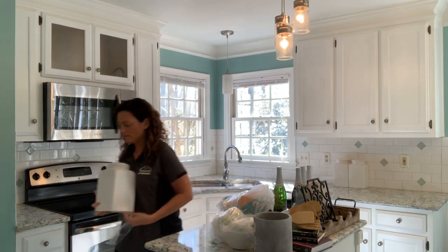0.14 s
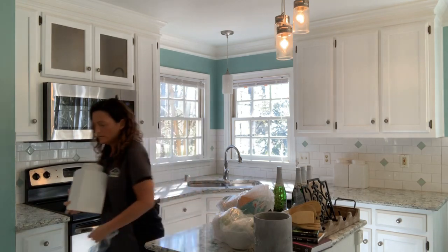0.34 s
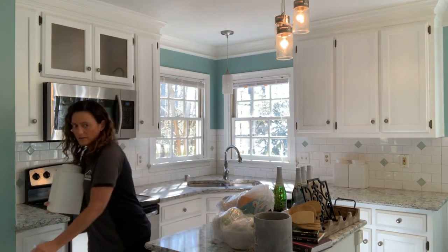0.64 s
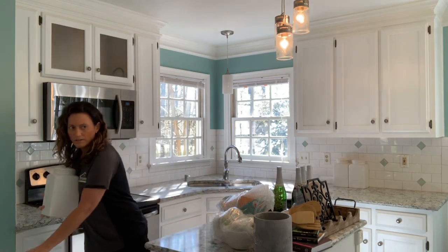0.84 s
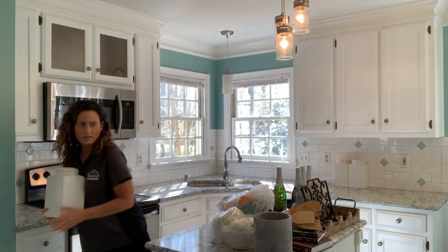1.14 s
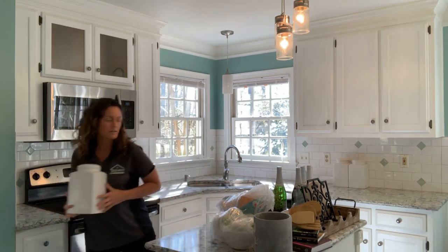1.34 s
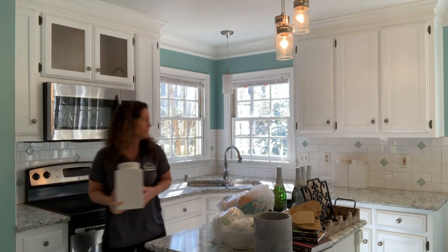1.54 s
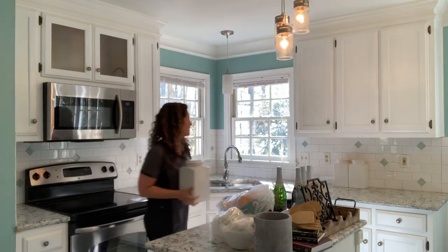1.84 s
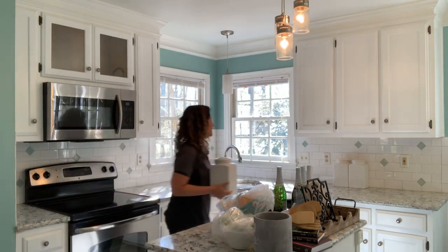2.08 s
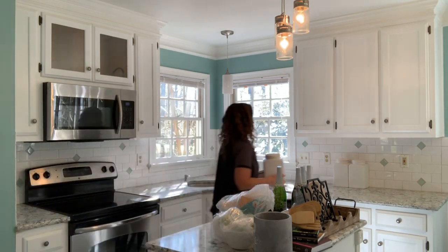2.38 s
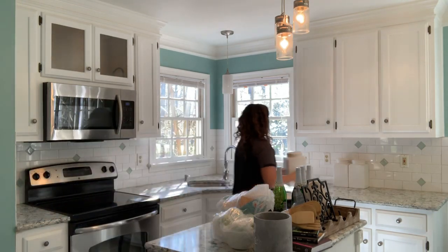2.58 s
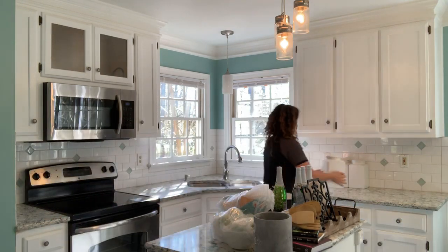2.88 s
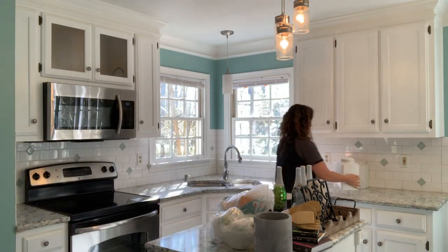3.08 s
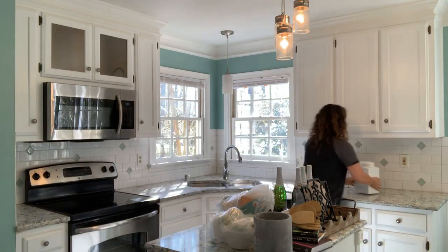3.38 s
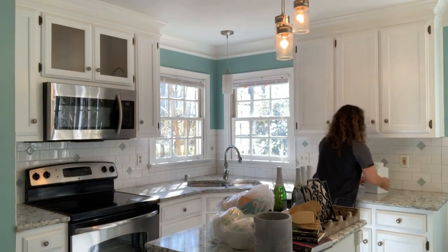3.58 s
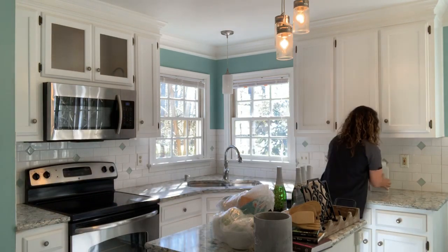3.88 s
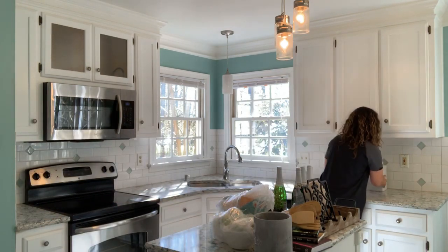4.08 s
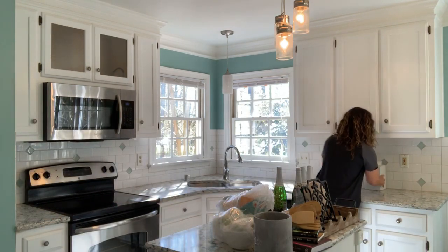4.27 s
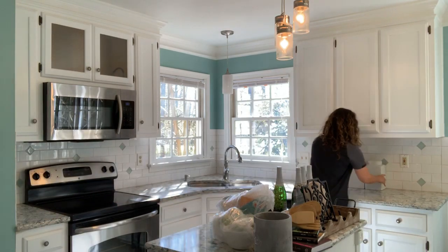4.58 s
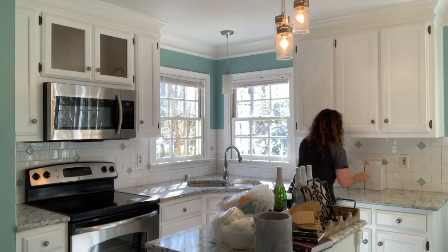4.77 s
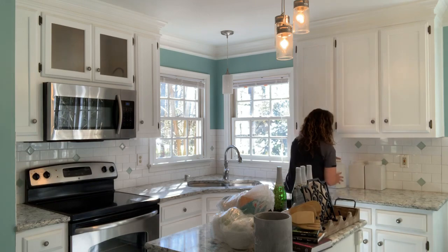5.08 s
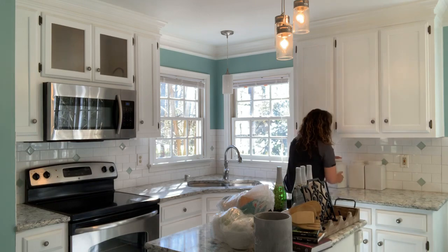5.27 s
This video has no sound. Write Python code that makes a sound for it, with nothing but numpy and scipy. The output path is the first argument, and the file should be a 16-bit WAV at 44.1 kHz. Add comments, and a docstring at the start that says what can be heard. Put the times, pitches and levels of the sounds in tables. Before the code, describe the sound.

Footsteps and cloth rustle, a wooden door bangs with quick rebounds, then a ceramic canister knocks and rocks onto a counter and scrapes along it.

```python
"""Lidded canister set down in a kitchen

A woman walks with a ceramic canister, clothes rustling; a wooden door bangs. She sets it on the counter in
two rocking blows with a chattering lid, knocks it against a neighbour and slides it: damped modes, noise bursts, grains.
The microphone stands across the hard-walled room, so most of every knock is reverberation.
Air noise and a refrigerator hum lie underneath.
"""
import sys
import numpy as np
from scipy import signal
from scipy.fft import rfft, irfft, next_fast_len
from scipy.io import wavfile
from scipy.ndimage import map_coordinates

SR = 44100
rng = np.random.default_rng(int(sys.argv[2]) if len(sys.argv) > 2 else 0)


def master(y):
    """Save y as 16-bit WAV."""
    cut = np.clip(np.atleast_2d(y).T, -1, 1)
    pcm = np.round(cut * 32767)  # scale
    wavfile.write(sys.argv[1], SR, pcm.astype(np.int16))


N = 239145
TIME = np.arange(N) / SR
AGE = np.arange(SR // 2) / SR  # s since a blow

# Levels in mode and spectrum tables are relative; mode t60 is multiplied by ring()'s hold.

# canister wall and lid modes: f/Hz, level/dB, t60/s before hold
CANISTER_MODES = [(1790, -10, .15), (1885, -11, .3), (2039, -12, .45), (2189, -6, .5), (2299, -11, .2),
                  (2895, -8, .35), (3080, -12, .15), (3250, -5, .25), (3540, -7, .2), (4220, 0, .33),
                  (4347, -2, .28), (4728, -11, .3), (5035, -10, .2), (5240, -7, .15), (5385, -11, .22),
                  (6320, -17, .18), (6553, -20, .2), (6860, -16, .25), (7064, -17, .2), (7204, -14, .22),
                  (7385, -18, .2), (7563, -16, .25), (7720, -13, .25), (8729, -25, .25), (9116, -21, .28),
                  (9850, -26, .25), (10492, -32, .3), (11015, -28, .22), (12642, -30, .22),
                  (13983, -30, .2)]
# neighbouring canister modes: f/Hz, level/dB, t60/s before hold
NEIGHBOUR_MODES = [(1201, 0, .35), (1325, -4, .4), (1560, -3, .2), (1712, -4, .35), (1890, -7, .9),
                   (2121, -6, .5), (2480, -6, .15), (2890, -8, .3), (3149, -6, .25), (3505, -8, .35),
                   (3840, -11, .35), (4550, -12, .3), (4748, -12, .35), (5405, -14, .3), (5640, -12, .3),
                   (6830, -18, .3), (7530, -19, .4), (7644, -18, .4), (8436, -23, .4), (10546, -27, .4),
                   (11300, -27, .4)]
# counter and cabinet modes: f/Hz, level/dB, t60/s before hold
COUNTER_MODES = [(116, -25, 0.12), (207, -11, 0.11), (269.4, -2.5, 0.13), (314, -2, 0.061),
                 (369, -0.5, 0.08), (404.8, -1.5, 0.15), (484.5, 1.5, 0.083), (557, -12.5, 0.049),
                 (598.4, -4, 0.052), (703, 1, 0.099)]
# hollow body spectrum: f/clack pitch [ratio], level/dB
CLACK_SPECTRUM = [(.22, -15.5), (.6, -3), (.85, -2), (1, 3.5), (1.15, -10), (1.35, -4), (1.6, -9),
                  (1.9, -16), (2.6, -23), (4.4, -45), (13, -61)]
# glaze spectrum: f/Hz, level/dB
GLAZE_SPECTRUM = [(600, -10), (1700, 17), (2400, 13.5), (3400, 13), (5300, 4), (6100, 0.5), (7600, -2),
                  (9000, -9), (12000, -20), (16000, -28)]


def canister(chatter_s=.004, bounces=3):
    """Each contact thuds the counter, clacks the hollow body and rings the ceramic, whose loose lid chatters."""
    out = np.zeros(N)
    neighbour = ring(NEIGHBOUR_MODES, attack_s=0.00026, hold=0.69)
    upper = ring(glaze(t60_s=0.11), attack_s=0.00037)
    for t, thud_db, clack_db, clack_hz, click_db, own_db, neighbour_db in contacts():
        thud = amp(thud_db) * ring(COUNTER_MODES, attack_s=0.0012, hold=0.84, detune=0.012)
        clack_spectrum = [(ratio * clack_hz, db) for ratio, db in CLACK_SPECTRUM]
        clack = amp(clack_db) * burst(clack_spectrum, t60_s=0.037, attack_s=0.00088)
        snap = burst(GLAZE_SPECTRUM, t60_s=0.035, attack_s=0.00075)
        click = amp(click_db) * (amp(-4.0) * snap + amp(-15.5) * upper)
        add(out, t, kitchen(thud + clack + click, direct_db=-4.0))

        own = ring(CANISTER_MODES, attack_s=0.00056, hold=0.32, detune=0.0027)
        chime = (amp(own_db) * own + amp(neighbour_db) * neighbour) / np.sqrt(bounces)
        for bounce in range(bounces):
            delay_s = bounce * chatter_s * rng.uniform(.7, 1.2)
            add(out, t + delay_s, kitchen(chime, direct_db=-6.5))
    return out


# canister lands and rocks on its base: t/s, force level/dB, first rock/s, rocks [count],
# loss at first rock/dB, clack pitch f/Hz, then levels relative to force:
# thud/dB, clack/dB, glaze click/dB, own ring/dB, neighbour's ring/dB
LANDING_BLOWS = [(3.451, -21, 0.066, 1, 3.5, 920, -3.5, 3.5, -0.5, 0, -10.5),
                 (3.674, -22, 0.051, 4, 2.05, 876, 0.5, -2, -1, 1, -4.5),
                 (4.465, -20, .030, 1, 5, 1200, 1, 0, -1.5, -19.5, -9)]
FAR_EDGE_S, FAR_EDGE_DB = .008, -3  # far edge of the base follows the near one
ROCK_SHRINK, ROCK_LOSS_POWER = 0.94, 1.3  # interval ratio per rock; loss grows as rock number ** power
# light taps of lid and base: t/s, clack level/dB, clack pitch f/Hz, glaze click rel. clack/dB
LIGHT_TAPS = [(1.363, -67, 1500, 2), (2.059, -54, 1230, 3.5), (3.055, -71, 1210, 12),
              (3.441, -41, 960, -25), (4.402, -41, 1220, -1.5), (4.433, -36, 925, -8),
              (4.611, -24, 920, -6.5), (4.687, -26.5, 1385, -7), (4.896, -37, 745, -21)]
TAP_THUD_DB, TAP_RING_DB = -21.5, -16.5  # thud rel. clack, ring rel. click


def contacts():
    """Touches: t/s, thud/dB, clack/dB, clack f/Hz, click/dB, own ring/dB, neighbour's ring/dB; rocks lose force."""
    for (t, force_db, rock_s, rocks, loss_db, clack_hz,
         thud_db, clack_db, click_db, own_db, neighbour_db) in LANDING_BLOWS:
        blows = [(t, force_db), (t + FAR_EDGE_S, force_db + FAR_EDGE_DB)]
        for k in range(round(rocks)):
            t += rock_s * ROCK_SHRINK ** k
            blows.append((t, force_db - loss_db * (k + 1) ** ROCK_LOSS_POWER))
        for at, db in blows:
            yield at, db + thud_db, db + clack_db, clack_hz, db + click_db, db + own_db, db + neighbour_db
    for t, db, clack_hz, click_db in LIGHT_TAPS:
        ring_db = db + click_db + TAP_RING_DB
        yield t, db + TAP_THUD_DB, db, clack_hz, db + click_db, ring_db, ring_db


def glaze(t60_s, count=90):
    """Crowd of weak upper modes of fired clay: rows of f/Hz, level/dB, t60/s."""
    hz = np.linspace(1500, 15500, count) + rng.uniform(-70, 70, count)
    db = along(GLAZE_SPECTRUM, hz) + 3 * rng.standard_normal(count)
    return np.transpose([hz, db, np.full(count, t60_s)])


# pushes sliding the base over stone: start t/s, length/s, judder level/dB, grit rel. judder/dB
SLIDE_PUSHES = [(4.007, .24, -40, -8), (4.329, 0.12, -44, -17), (4.649, 0.095, -33, 3),
                (4.782, 0.23, -38, -7.5), (5.235, .17, -44.5, -13.5)]
# stick-slip spectrum: f/Hz, level/dB
JUDDER_SPECTRUM = [(100, -24), (200, -5.5), (280, -1.5), (450, 2.5), (700, -0.5), (950, -7), (1300, -44),
                   (2000, -20), (3500, -50), (9000, -50)]
# grit grain spectrum: f/Hz, level/dB
GRIT_SPECTRUM = [(400, -7), (780, 6), (940, 13.5), (1150, 7), (1350, 8), (1600, 4), (1950, -1.5),
                 (2600, -23), (3700, -10.5), (5650, -7), (9000, -17.5), (15000, -33)]


def slide():
    """The base sticks and slips at an uneven rate; grains of grit catch and make the ceramic sing."""
    judder, grit = np.zeros((2, N))
    for t, length_s, db, grit_db in SLIDE_PUSHES:
        push = amp(db) * stroke(t, length_s, rise=0.28, release_db_per_s=263)
        judder += push
        grit += amp(grit_db) * push

    slip_hz = 130 * np.exp(.45 * wobble(25))
    slip_clicks = np.diff(np.floor(np.cumsum(slip_hz) / SR), prepend=0)
    slips = slip_clicks * amp(2.8 * rng.standard_normal(N))
    catches = rng.random(N) < 500 / SR  # 500 a second on average
    grains = catches * rng.standard_normal(N) * amp(4 * wobble(45))

    upper = ring(glaze(t60_s=0.13), attack_s=.0002)
    body = ring(NEIGHBOUR_MODES, attack_s=0.00047, hold=0.47) + amp(-14.5) * upper
    singing = unit(signal.fftconvolve(grains, body)[:N])
    stick_slip = judder * (coloured(slips, JUDDER_SPECTRUM) + amp(-27.5) * singing)
    gritty = grit * (coloured(grains, GRIT_SPECTRUM) + amp(-5.5) * singing)
    return kitchen(stick_slip + gritty, direct_db=-6.0)[:N]


# door panel spectrum: f/knock pitch [ratio], level/dB
PANEL_SPECTRUM = [(.2, -42), (.45, 3), (.75, -3.5), (1, 11), (1.3, -4.5), (1.7, -31), (3, -35), (8, -43),
                  (25, -78)]
# wood chattering or brushed: f/Hz, level/dB
WOOD_SPECTRUM = [(200, -20), (680, 6.5), (1000, 0.5), (1300, -0.5), (1700, -7), (2600, -6), (4200, -8.5),
                 (5500, -18), (7500, -24.5), (10000, -42), (15000, -54)]
# floor and cabinet thump spectrum: f/Hz, level/dB
FLOOR_SPECTRUM = [(25, -31), (50, -36), (75, 2.5), (100, 2.5), (135, -15.5), (185, -26), (260, -6.5),
                  (330, -22.5), (700, -22.5), (2000, -33.5), (6000, -63)]
BANG_S, SHUDDER_S = 2.253, .0228  # first blow; interval between rebounds
KNOCK_DB, KNOCK_LOSS_DB = -19.5, 2.9  # panel: first blow, loss per rebound
DOOR_RATTLE_DB, DOOR_RATTLE_LOSS_DB = -23, 1.4  # frame: first blow, loss per rebound
THUMP_DB, THUMP_LOSS_DB = -35.5, 6.5  # cabinet: midway between rebounds 2 and 3, loss per rebound
KNOCK_HZ, SETTLED_HZ, KNOCK_GLIDE = 444, 243, 0.44  # pitch sinks; share of gap left per rebound


def cupboard(blows=5):
    """A wooden door bangs and rebounds evenly, ever softer and deeper; the rebounds shake the cabinet."""
    out = np.zeros(N)
    for k in range(blows):
        knock_hz = SETTLED_HZ + (KNOCK_HZ - SETTLED_HZ) * KNOCK_GLIDE ** k
        thump_gain = (k > 0) * amp(THUMP_DB - THUMP_LOSS_DB * (k - 2.5))
        thump = thump_gain * burst(FLOOR_SPECTRUM, t60_s=0.063, attack_s=0.00076)
        panel = [(ratio * knock_hz, db) for ratio, db in PANEL_SPECTRUM]
        knock = amp(KNOCK_DB - KNOCK_LOSS_DB * k) * burst(panel, t60_s=0.052, attack_s=0.0015)
        rattle_gain = amp(DOOR_RATTLE_DB - DOOR_RATTLE_LOSS_DB * k)
        rattle = rattle_gain * burst(WOOD_SPECTRUM, t60_s=0.045, attack_s=0.0011)
        bang = kitchen(thump + knock + rattle, direct_db=-8, mode_db=-57.5)
        add(out, BANG_S + k * SHUDDER_S, bang)
    return out


# footfalls on the wooden floor: t/s, heel level/dB
FOOTFALLS = [(0.226, -42), (.886, -45.5), (0.976, -43.5), (1.363, -42.5), (1.727, -37.5), (2.72, -48),
             (4.269, -42), (5.149, -46)]
TOE_S, TOE_DB = .052, -3.5  # toe after heel, rel. heel
SCUFF_DB, SCUFF_GROWTH = -51, 1.36  # brush at the heaviest step; dB lost per dB of a lighter step
SCUFF_LEAD_S, SCUFF_S = 0.051, 0.072  # brush starts before the heel; length before release


def walker():
    """Heel, then toe, thump the floor; the heavier the step, the more the sole brushes."""
    out, brush = np.zeros((2, N))
    heaviest_db = max(db for t, db in FOOTFALLS)
    for t, db in FOOTFALLS:
        for at, level_db in [(t, db), (t + TOE_S, db + TOE_DB)]:
            thump = amp(level_db) * burst(FLOOR_SPECTRUM, t60_s=0.076, attack_s=0.0049)
            add(out, at, kitchen(thump, direct_db=-3.5, mode_db=-55))
        scuff_db = SCUFF_DB + SCUFF_GROWTH * (db - heaviest_db)
        brush += amp(scuff_db) * stroke(t - SCUFF_LEAD_S, SCUFF_S, rise=0.94, release_db_per_s=113)
    return out + brush * coloured(rng.standard_normal(N), WOOD_SPECTRUM)


# sleeve and shirt swishes, one per arm movement: start t/s, length/s, rub level/dB
ARM_SWISHES = [(-.14, 0.52, -44), (.36, 0.22, -44.5), (0.75, .19, -46.5), (1.22, 0.13, -53.5),
               (1.468, 0.22, -51.5), (2.008, 0.068, -51), (2.135, 0.079, -55.5), (2.6, 0.14, -56.5),
               (2.85, 0.036, -57), (3.05, 0.066, -74), (3.32, 0.092, -62)]
# cloth spectrum: f/Hz, level/dB
CLOTH_SPECTRUM = [(300, -16), (450, -5), (700, -7), (1250, -8), (1800, -9.5), (2800, -8), (5000, -4.5),
                  (7800, -6), (9000, -11.5), (15800, -15.5)]
# canister modes under the palm: f/Hz, level/dB, t60/s before hold
HELD_MODES = [(1800, 8, 0.38), (2260, 3, 0.7), (2900, -3, 0.56), (3700, 2, 0.58), (4700, 1, 0.83)]
PALM_DB, PALM_GROWTH = -31, 0.64  # level at rub = 1; exponent below 1: grows more slowly than cloth


def clothes():
    """Each arm movement rubs cloth in fine uneven grains, and the palm on the carried canister."""
    swishes = [amp(db) * stroke(t, length_s, rise=1.0, release_db_per_s=66)
               for t, length_s, db in ARM_SWISHES]
    rub = np.linalg.norm(swishes, axis=0) * amp(0.95 * wobble(21.84))
    fibres = coloured(rng.standard_normal(N) * amp(1.7 * wobble(250)), CLOTH_SPECTRUM)
    held = ring(HELD_MODES, attack_s=0.00083, hold=0.091)
    singing = unit(signal.fftconvolve(rng.standard_normal(N), held)[:N])
    return amp(-4.5) * rub * fibres + amp(PALM_DB) * rub ** PALM_GROWTH * singing


# moving air spectrum: f/Hz, level/dB
AIR_SPECTRUM = [(15, -64), (25, -0.5), (50, -0.5), (102, -0.5), (152, -6.5), (184, -13.5), (222, -5),
                (248, 2), (276, -10), (437, -9), (572, -14.5), (834, -15.5), (2330, -27), (4330, -30),
                (15800, -55)]
# refrigerator tones: f/Hz, peak level/dB
HUM_TONES = [(99, -54.5), (199.2, -56), (441, -64.5)]


def room_tone():
    """Moving air as coloured noise; the refrigerator's hum as sines of wandering phase."""
    air = amp(-50.5 + 0.31 * wobble(4.3)) * coloured(rng.standard_normal(N), AIR_SPECTRUM)
    hum = sum(amp(db) * np.sin(2 * np.pi * hz * TIME + 0.62 * wobble(4.23)) for hz, db in HUM_TONES)
    return air + hum


# diffuse reverberation: f/Hz, t60/s
KITCHEN_T60 = [(70, 0.19), (250, 0.71), (600, 0.72), (1500, 0.69), (4000, 0.54), (8000, 0.41),
               (15000, 0.72)]
STANDING_HZ = 74.5  # strongest standing wave


def kitchen(x, direct_db, walls_db=-6, build_s=0.0012, mode_db=-55, mode_t60_s=0.57, count=8):
    """Direct sound, a few reflections, a diffuse tail and one low standing wave; levels rel. diffuse tail."""
    hz, t, z = signal.stft(rng.standard_normal(SR), SR, nperseg=256)
    decay = amp(-60 * t / along(KITCHEN_T60, hz)[:, None])
    response = signal.istft(z * decay, SR, nperseg=256)[1]
    age = np.arange(len(response)) / SR
    response *= 1 - np.exp(-age / build_s)
    response /= np.linalg.norm(response)
    response += amp(mode_db - 60 * age / mode_t60_s) * np.sin(2 * np.pi * STANDING_HZ * age)
    delay_s, size = rng.uniform(.002, .03, count), rng.standard_normal(count)
    response[(delay_s * SR).astype(int)] += amp(walls_db) * size / np.linalg.norm(size)
    response[0] += amp(direct_db)
    return signal.fftconvolve(x, response / np.linalg.norm(response))


def burst(spectrum, t60_s, attack_s):
    """Many crowded modes, struck together and soon damped: decaying coloured noise."""
    noise = coloured(rng.standard_normal(len(AGE)), spectrum)
    return blow(noise * amp(-60 * AGE / t60_s) * (1 - np.exp(-AGE / attack_s)))


def ring(modes, attack_s, hold=1, detune=0):
    """Distinct damped modes, strengths redrawn per call; hold scales t60, detune is the grip's relative shift."""
    hz, db, t60_s = np.transpose(modes)[:, :, None]
    level_db = db + rng.standard_normal(hz.shape)
    pitch_hz = hz * (1 + detune * rng.standard_normal(hz.shape))
    phase_cycles = rng.random(hz.shape)
    decay = amp(level_db - 60 * AGE / (t60_s * hold))
    waves = decay * np.sin(2 * np.pi * (pitch_hz * AGE + phase_cycles))
    return blow(waves.sum(0) * (1 - np.exp(-AGE / attack_s)))


def stroke(start_s, length_s, rise, release_db_per_s):
    """A rub gathers speed over the share rise of its length, holds any remainder, and dies away."""
    speed = np.clip((TIME - start_s) / (length_s * rise), 0, 1)
    release_db = -release_db_per_s * np.maximum(TIME - start_s - length_s, 0)
    return np.sin(np.pi / 2 * speed) * amp(release_db)


def wobble(rate_hz):
    """Smooth random curve through rate_hz knots a second."""
    knots = rng.standard_normal(int(N * rate_hz / SR) + 4)
    return map_coordinates(knots, [TIME * rate_hz])


def coloured(x, spectrum):
    """Filter x through rows of f/Hz, level/dB; scale to rms 1."""
    m = next_fast_len(len(x) + 8192)
    gain = amp(along(spectrum, np.fft.rfftfreq(m, 1 / SR)))
    return unit(irfft(rfft(x, m) * gain, m)[:len(x)])


def along(points, hz):
    """Interpolate rows of f/Hz, value on a log frequency axis."""
    f, v = np.transpose(points)
    return np.interp(np.log(hz + 1), np.log(f + 1), v)


def amp(db):
    """Decibels to gain."""
    return 10 ** (np.asarray(db) / 20)


def unit(x):
    """Scale to rms 1."""
    return x / np.sqrt(np.mean(x ** 2) + 1e-20)


def blow(x):
    """Scale to the energy of 0.05 s at rms 1."""
    return x * np.sqrt(SR / 20 / (np.sum(x ** 2) + 1e-20))


def add(track, t, x):
    """Mix x into track at t/s, cut at the track's end."""
    part = track[max(round(t * SR), 0):][:len(x)]
    part += x[:len(part)]


def scene():
    """Sum of all sources at one microphone."""
    return (canister() + slide() + cupboard() + walker() + clothes() + room_tone())[None]


TOP_HZ = 15850


def record(dry):
    """The microphone channel cuts the deepest bass and keeps nothing from TOP_HZ up."""
    highpass = signal.butter(4, 50, "highpass", fs=SR, output="sos")
    lean = signal.sosfilt(highpass, dry)
    m = next_fast_len(N + SR // 2)
    passband = np.fft.rfftfreq(m, 1 / SR) < TOP_HZ
    return irfft(rfft(lean, m) * passband, m)[..., :N]


dry = scene()
out = record(dry)
master(out)
```